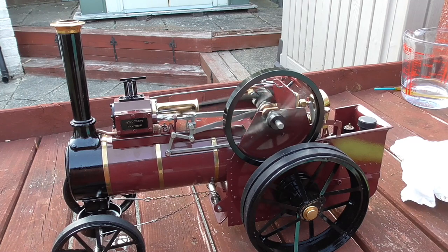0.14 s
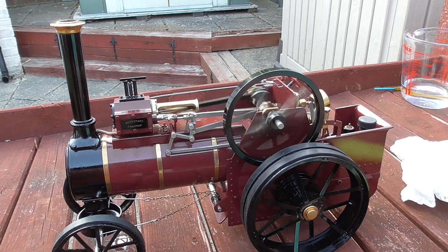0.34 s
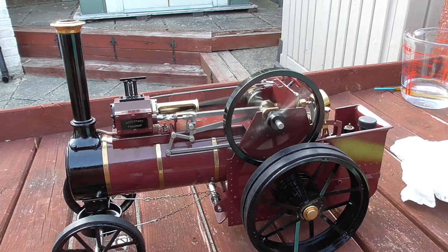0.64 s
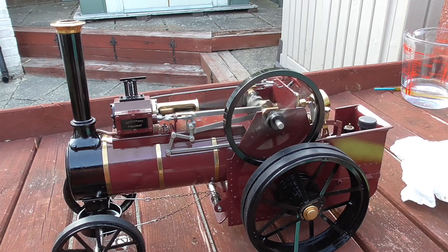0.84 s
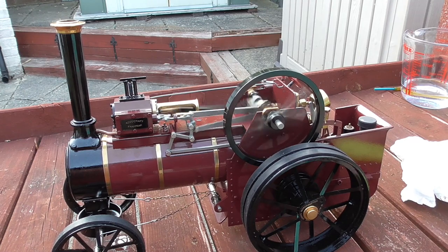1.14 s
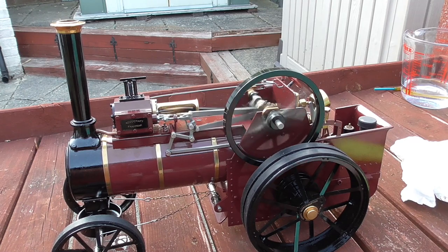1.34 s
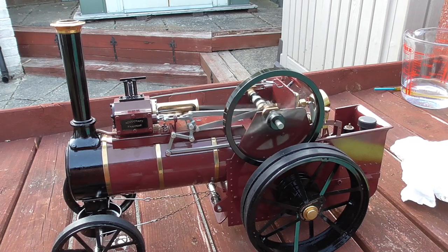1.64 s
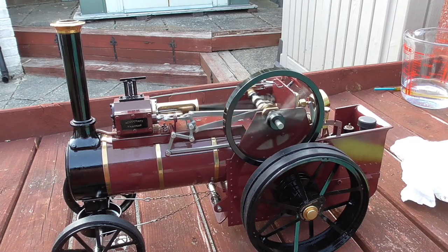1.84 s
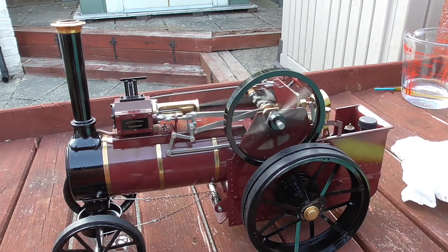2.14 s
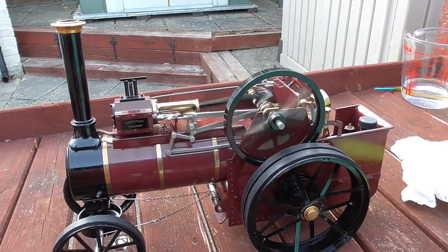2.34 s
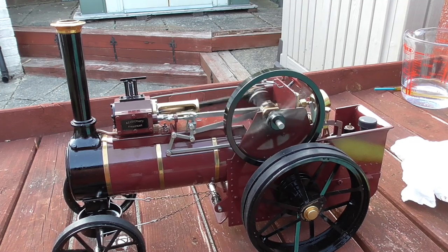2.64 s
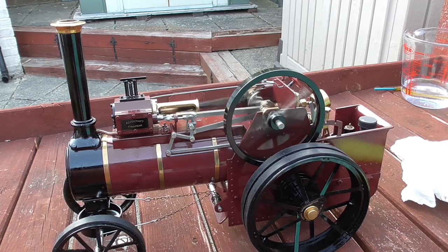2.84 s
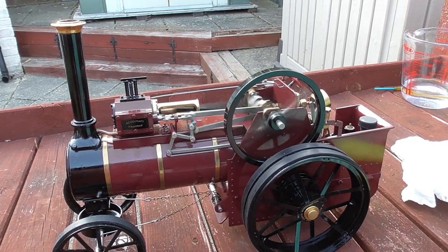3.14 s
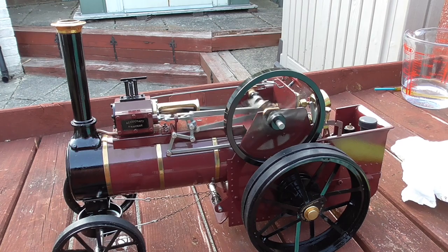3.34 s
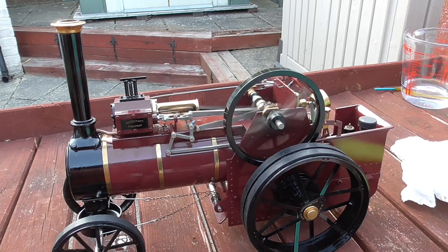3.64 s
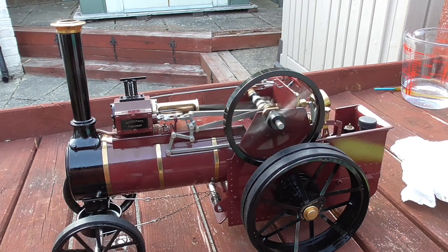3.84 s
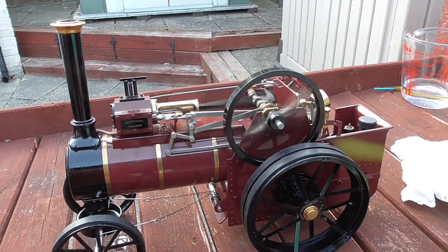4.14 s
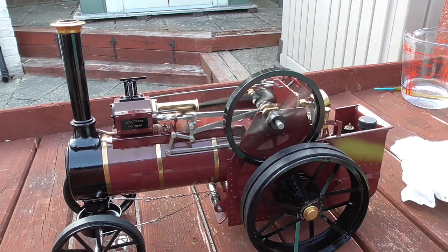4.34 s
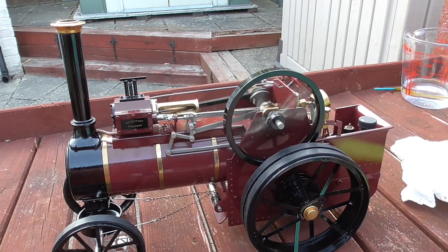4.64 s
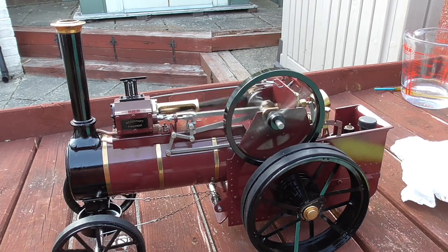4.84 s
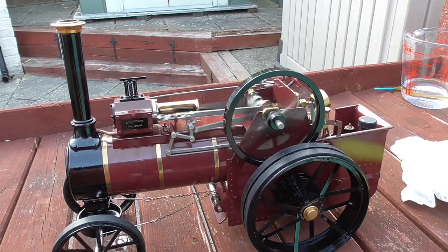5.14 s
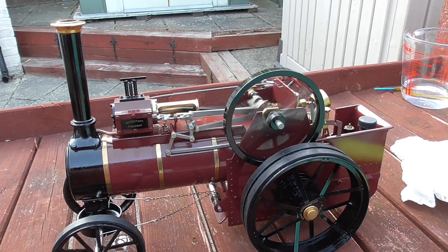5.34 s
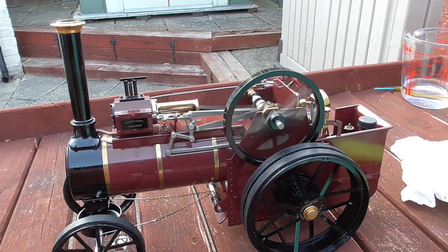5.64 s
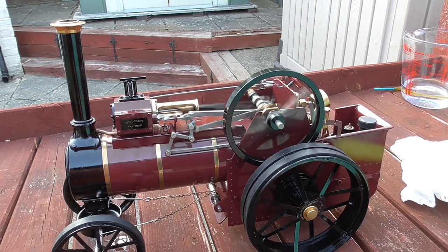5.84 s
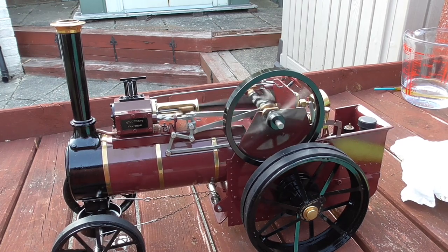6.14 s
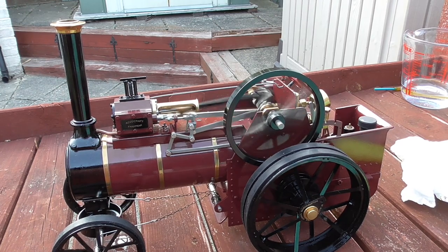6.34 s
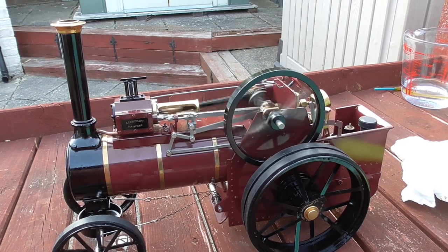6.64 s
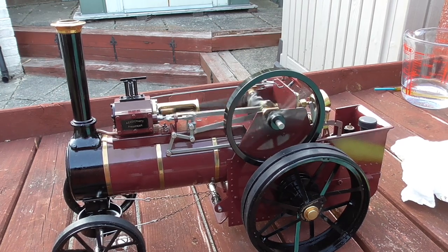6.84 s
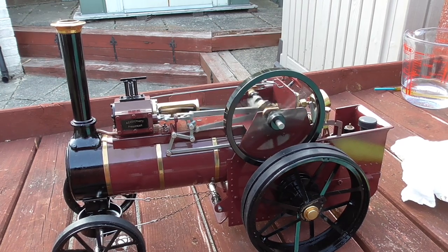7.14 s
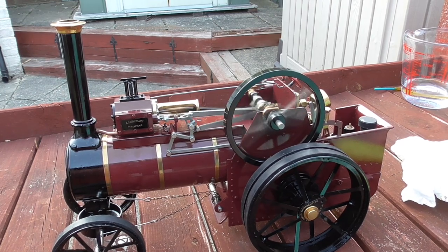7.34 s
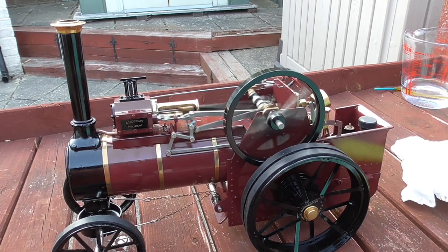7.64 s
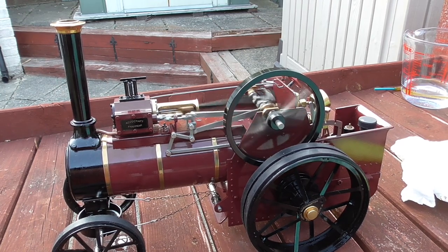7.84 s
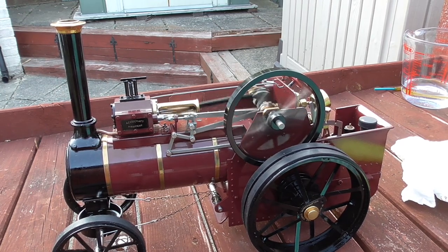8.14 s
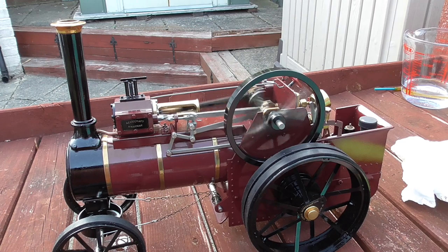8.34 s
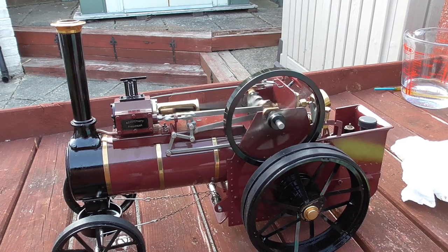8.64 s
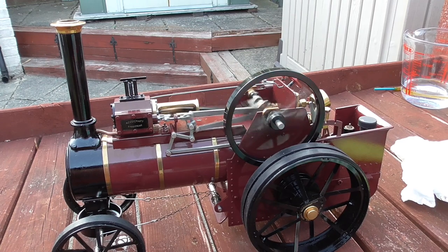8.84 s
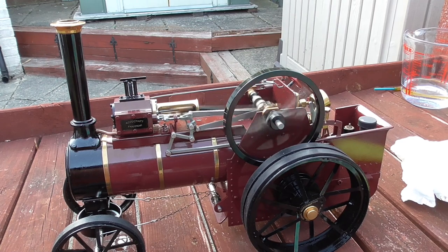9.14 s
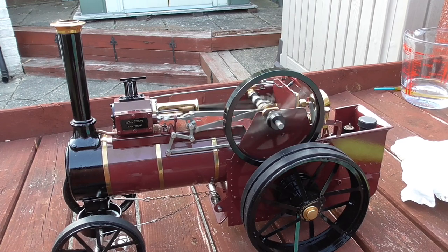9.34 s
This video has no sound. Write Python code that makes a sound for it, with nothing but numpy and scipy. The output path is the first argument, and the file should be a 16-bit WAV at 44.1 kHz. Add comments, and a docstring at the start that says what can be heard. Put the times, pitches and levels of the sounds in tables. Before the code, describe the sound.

A small model steam engine is already running at the start and keeps going unchanged to the end, about 9.5 seconds, on wooden decking in a yard, close to a stereo microphone. It turns a little over ten times a second, almost perfectly steady, with two exhaust beats per turn: a hard, bright puff with a whistling edge, then a longer hissy beat, sharper on some strokes. Steam hiss never quite stops. Light, dry metal taps from valve gear and rods tick in a fixed pattern each turn. Beneath, a gas burner gives a soft, hollow roar, swelling briefly near 1.1, 2.3, 3.3, 4.7 and 5.6 seconds, and mildly near 8.8. Tiny water spits crack at about 2, 4.7, 5.9 and 6.9 seconds, the strongest near 7.7. A faint distant rumble rises after 4 seconds, with a small bump near 4.5. Echoes are short and slight.

```python
"""A hard, fast chuff with a whistling edge, light metal taps, a burner's roar and a faint far rumble.
A small gas-fired model steam engine runs at over ten turns a second on wooden decking in a yard,
close to two microphone ports. Its double-acting cylinder exhausts twice a turn up the chimney as
shaped noise, the valve gear taps in decaying sines at set crank angles, drops of water spit in
the blast pipe, and the flame is noise through flue resonances, swelling now and then."""
import sys
import numpy as np
from scipy import signal
from scipy.fft import rfft, irfft, next_fast_len
from scipy.io import wavfile
from scipy.ndimage import uniform_filter1d

SR = 44100
rng = np.random.default_rng(int(sys.argv[2]) if len(sys.argv) > 2 else 0)


def pcm_store(signal):
    """Save signal as 16-bit PCM."""
    levels = np.round(np.clip(np.atleast_2d(signal), -1, 1) * 32767)
    wavfile.write(sys.argv[1], SR, levels.astype(np.int16).T)


N = 418509
TIME_S = np.arange(N) / SR
FILTER_HZ = np.fft.rfftfreq(4096, 1 / SR)


def gain_of(db):
    """Amplitude ratio of a level in dB."""
    return 10 ** (np.asarray(db) / 20)


def evened(x):
    """Scales a signal to an RMS of one."""
    return x / np.sqrt(np.mean(x ** 2) + 1e-20)


def read(points, hz):
    """Reads a curve between its points, along a logarithmic frequency axis."""
    point_hz, value = np.transpose(points)
    return np.interp(np.log(hz + 1), np.log(point_hz + 1), value)


def coloured(x, modes, steep, tilt_db=0):
    """Passes x through resonances whose powers add, with causal phase and unit gain for white noise."""
    power = 0
    for centre_hz, width_hz, level_db in modes:
        detuning = 2 * (FILTER_HZ - centre_hz) / width_hz
        power = power + gain_of(2 * level_db) / (1 + detuning ** 2) ** steep
    # folding the cepstrum forward in time gives minimum phase
    cepstrum = irfft(np.log(power * gain_of(2 * tilt_db) + 1e-12) / 2)
    cepstrum[1:2048] *= 2
    cepstrum[2049:] = 0
    taps = irfft(np.exp(rfft(cepstrum)))[:2048]
    return signal.oaconvolve(x, taps[None] / np.linalg.norm(taps), axes=1)[:, :N]


def turbulence(lumpy_db, size):
    """Two unrelated noises under one lumpy envelope, smoothed twice over size samples."""
    smooth = uniform_filter1d(uniform_filter1d(rng.standard_normal(N), size), size)
    return evened(rng.standard_normal((2, N)) * gain_of(lumpy_db * evened(smooth)))


def opening(age, start, rise):
    """A port opens smoothly from shut (0) to wide (1)."""
    return np.sin(np.pi / 2 * np.clip((age - start) / rise, 0, 1)) ** 2


# The flywheel gains speed very slowly: columns turn_number, start_s
CRANK_TURNS = [(0, -.0370), (10, .9205), (20, 1.8780), (30, 2.8320), (40, 3.7869), (50, 4.7395),
               (60, 5.6895), (70, 6.6402), (80, 7.5855), (85, 8.0545), (90, 8.5268), (100, 9.4730)]
TURN_COUNT = 101


def turn_starts():
    """Seconds at which each crank turn begins, evenly spaced between the tabled turns."""
    turn, start_s = np.transpose(CRANK_TURNS)
    return np.interp(np.arange(TURN_COUNT), turn, start_s)


# Level of the far rumble: columns time_s, level_db
RUMBLE_LEVEL = [(0, -59), (3.8, -60), (4.2, -54.5), (4.42, -56), (4.5, -47), (4.6, -57), (5.5, -56),
                (6.5, -57), (7.3, -55), (8.0, -57.5), (8.5, -55.5), (9.49, -57.5)]
# Its low resonances: columns centre_hz, width_hz, level_db
RUMBLE_MODES = [(71.6, 29, -1), (101.2, 35, 4.5)]


def rumble():
    """A faint rumble from beyond the yard comes and goes: noise through two low resonances."""
    time_s, level_db = np.transpose(RUMBLE_LEVEL)
    level = gain_of(np.interp(TIME_S, time_s, level_db))
    return coloured(level * rng.standard_normal((2, N)), RUMBLE_MODES, 3.2)


# Steady roar of the flame: columns time_s, level_db
FLAME_LEVEL = [(0, -34), (1.2, -34.5), (1.8, -34), (2.6, -32.5), (3.6, -34), (4.4, -34), (5.4, -34.5),
               (6.2, -35), (6.9, -34), (7.8, -35), (8.3, -34), (9.05, -36), (9.49, -34.5)]
# The flame flares up: columns peak_s, rise_db, half_length_s
FLAME_FLARES = [(1.109, 5, 0.069), (2.286, 4, .12), (2.64, 2, 0.15), (2.947, 0.5, .1), (3.32, 4.5, .12),
                (3.82, 1, .1), (4.28, 3, 0.095), (4.658, 5.5, 0.084), (4.967, 2, 0.083), (5.58, 3, .12),
                (5.819, 1.5, .1), (8.099, 1.5, .15), (8.831, 2.5, .09)]
# Resonances of the flue: columns centre_hz, width_hz, level_db
FLUE_MODES = [(189, 81, -3.5), (354, 232, -1), (714.3, 196, 5.5), (1377, 266, 2)]
# Overall colour of the roar: columns frequency_hz, level_db
FLAME_COLOUR = [(20, -34), (60, -17.5), (130, -2.5), (200, -1.5), (1500, -5.5), (1750, -17.5),
                (4000, -40.5)]


def burner():
    """The flame roars through the flue resonances; each exhaust beat draws on the fire a little."""
    time_s, level_db = np.transpose(FLAME_LEVEL)
    roar_db = np.interp(TIME_S, time_s, level_db)
    for peak_s, rise_db, half_s in FLAME_FLARES:
        roar_db += rise_db * np.clip(1 - abs(TIME_S - peak_s) / half_s, 0, 1)
    angle = 2 * np.pi * np.interp(TIME_S, turn_starts(), np.arange(TURN_COUNT))
    draught_db = 0.36 * np.cos(2 * angle - 1.3) + 0.42 * np.cos(angle - 2.2)
    flame = gain_of(roar_db + draught_db) * turbulence(1.54, size=250)
    roar = coloured(flame, FLUE_MODES, 1.795, read(FLAME_COLOUR, FILTER_HZ))
    deep = signal.lfilter(*signal.butter(2, [140, 300], "band", fs=SR), roar)
    # a swelling flame grows deeper
    return roar + 0.047 * (roar_db - np.median(level_db)) * deep


# Valve gear and rods, levels as at mid-scene:
# columns share_of_turn, pitch_hz, peak_db, drift_db_per_s, rise_s, t60_s
GEAR_TAPS = [(0.139, 1165, -37.5, -0.5, 0.004, 0.024), (.14, 1840, -48, 0, 0.0026, 0.026),
             (.15, 2227, -32.5, 0, 0.0022, 0.017), (.155, 2960, -37, 0.5, 0.0013, .009),
             (.475, 2152, -33.5, 0, 0.0048, .013), (.475, 2960, -37, -0.5, 0.0032, 0.0084),
             (0.509, 5080, -35, 0, 0.0034, 0.011), (.515, 4200, -49, -2, 0.0022, .01),
             (.515, 3200, -44, -2, .002, .008), (.515, 1890, -35, 0, 0.0041, 0.01),
             (.52, 1380, -41, -0.5, 0.0024, 0.013), (0.531, 2916, -33, 0, 0.0022, 0.014),
             (.52, 1186, -27.5, -0.17, 0.003, 0.022), (.585, 3370, -31, 0.25, 0.0032, 0.017),
             (.595, 2890, -33.5, 0, 0.0011, 0.019), (.6, 1884, -38.5, 0, 0.0019, 0.01),
             (.61, 5150, -41, 0.5, 0.0043, 0.017), (.63, 2325, -33.5, 0.5, 0.003, 0.013),
             (.65, 4050, -42, 0.5, .004, .012), (0.671, 1190, -37.5, -0.5, 0.0034, 0.024),
             (.78, 2880, -40.5, 0, 0.0021, 0.029), (.83, 3925, -35.5, 0.7, 0.0029, 0.018)]


def valve_gear():
    """Loose joints tap at set crank angles, each blow a decaying sine a little unlike the last."""
    opens, out = turn_starts(), np.zeros(N + SR)
    t = np.arange(2000) / SR
    for share, pitch_hz, peak_db, drift_db, rise_s, t60_s in GEAR_TAPS:
        chance = rng.standard_normal((TURN_COUNT - 1, 3))
        blow_s = opens[:-1] + share * np.diff(opens) + .0004 * chance[:, 0]
        shape = opening(t, 0, rise_s) * gain_of(-60 * np.maximum(t - rise_s, 0) / t60_s)
        for start_s, (_, force, bend) in zip(blow_s, chance):
            if start_s > 0:
                level_db = peak_db + drift_db * (start_s - N / SR / 2) + 0.62 * force
                ring = np.sin(2 * np.pi * pitch_hz * (1 + 0.011 * bend) * t)
                out[round(start_s * SR):][:len(t)] += gain_of(level_db) * shape * ring
    taps = out[:N]
    # a weak copy 40 samples later sets the two ports apart
    return np.array([taps, 0.17 * np.roll(taps, 40)])


# Blast pipe and chimney resonances:
# columns centre_hz, width_hz, front_puff_db, front_hiss_db, back_stroke_db
CHIMNEY_MODES = [(2310, 313, -9.5, 0.5, 2.5), (3040, 245, -14, -9, -9), (3450, 460, -9.5, -9, -5.5),
                 (4500, 365, 2.5, 2.5, 5), (5040, 650, -3.5, -7.5, -7), (6346, 590, -8, -5, -3.5),
                 (7124, 295, 5, 1, 5.5), (7470, 340, 0.5, -11, 1), (8725, 400, 4.5, 3.5, 9.5),
                 (9570, 330, 3, -4.5, 5.5), (9960, 310, 1.5, 4.5, 3), (10300, 500, 1.5, -3, 1.5),
                 (11410, 310, 0, -3, 1), (11940, 650, -0.5, -10, -2.5), (13200, 350, -11, -9.5, -6),
                 (13700, 400, -16, -12, -12), (14300, 300, -19, -16, -15), (15100, 600, -21, -15.5, -13)]
# Drops of water that spit in the blast pipe: columns start_s, level_db
WATER_SPITS = [(1.985, -25), (2.3027, -27), (4.674, -28), (5.891, -25), (6.880, -26), (7.517, -31),
               (7.7147, -17), (7.794, -26)]


def spits():
    """A drop flashes to steam: a very short bright crack through the chimney modes."""
    flow = np.zeros(N)
    for start_s, level_db in WATER_SPITS:
        fall_db = 5100 * np.clip(TIME_S - start_s, 0, 1)
        flow += gain_of(level_db - fall_db) * opening(TIME_S, start_s, .001)
    centre_hz, width_hz, *colours = np.transpose(CHIMNEY_MODES)
    return coloured(flow * rng.standard_normal((2, N)), zip(centre_hz, width_hz, colours[-1]), 1.4)


def crank():
    """Turn number and seconds since the front chuff began, for every sample."""
    jitter_s = .0007 * rng.standard_normal(TURN_COUNT)
    # each chuff begins its soft rise 2 ms before the marked turn start, give or take the jitter
    begins = turn_starts() + jitter_s - .002
    turn = np.clip(np.searchsorted(begins, TIME_S, "right") - 1, 0, None)
    return turn, TIME_S - begins[turn]


# Front strokes that sing out clearly: columns start_s, whistle_db, pitch_hz
SINGING_STROKES = [(.058, -25, 4530), (.73, -20, 4470), (.824, -22, 4550), (.92, -19, 4590),
                   (1.015, -19, 4470), (1.208, -18, 4460), (1.591, -21, 4420), (1.783, -20.5, 4540),
                   (2.07, -24, 4660), (2.164, -23, 4650), (2.26, -24, 4505), (2.451, -19, 4585),
                   (2.64, -24, 4370), (2.832, -24, 4490), (3.119, -22.5, 4580), (3.214, -22.5, 4530),
                   (3.309, -21, 4520), (3.501, -20, 4720), (3.787, -23, 4460), (3.882, -21, 4480),
                   (3.978, -19, 4470), (4.359, -21.5, 4540), (4.454, -22, 4470), (4.644, -23, 4420),
                   (4.74, -24, 4480), (5.119, -23, 4540), (5.498, -20, 4460), (5.594, -23, 4610),
                   (5.69, -21.5, 4410), (5.784, -23, 4440), (6.259, -24, 4570), (6.451, -23.5, 4370),
                   (6.546, -21, 4440), (7.207, -22, 4580), (7.774, -18, 4640), (7.868, -21, 4480),
                   (8.148, -24, 4500), (9.0, -21, 4480), (9.283, -22, 4330)]
# Back strokes that open with a sharp puff: columns start_s, puff_db
SHARP_BACK_STROKES = [(.004, -26), (.483, -24), (.58, -24), (1.057, -26), (1.919, -28), (2.301, -27),
                      (3.542, -24), (3.732, -24), (4.115, -23), (4.59, -26), (5.731, -25), (5.922, -26),
                      (6.017, -26), (6.492, -22), (7.627, -25), (7.815, -23), (8.284, -28), (8.946, -27),
                      (9.232, -24), (9.419, -23)]


def strokes():
    """Per turn: scattered drive levels in dB and whistle pitch in Hz, some set by the tables."""
    mean, spread = np.transpose([
        (-20.5, 0.78),  # front puff
        (-26.5, 2.3),  # whistle
        (-30.5, 1.2),  # front hiss
        (-29, 1.3),  # back puff
        (-29.5, 0.61),  # back hiss
        (4525, 100),  # whistle pitch
    ])
    rows = mean + spread * np.clip(rng.standard_normal((TURN_COUNT, 6)), -2, 2)
    opens = turn_starts()
    for start_s, whistle_db, pitch_hz in SINGING_STROKES:
        rows[abs(opens - start_s).argmin(), [1, 5]] = whistle_db, pitch_hz
    for start_s, puff_db in SHARP_BACK_STROKES:
        rows[np.searchsorted(opens, start_s) - 1, 3] = puff_db
    return rows


def whistle(level, pitch_hz, age):
    """The first rush sings in one pipe mode: narrow noise, steadier than plain noise, around a pitch."""
    jet = level * opening(age, 0, 0.0087) * gain_of(2.5 - 1140 * age)
    swing = np.exp(2j * np.pi * np.cumsum(pitch_hz) / SR)
    noise = rng.standard_normal((2, N)) + 1j * rng.standard_normal((2, N))
    waver = signal.lfilter(*signal.butter(2, 150, fs=SR), noise)
    waver /= abs(waver) ** 0.6  # evens out the swells
    return jet * evened((waver * swing).real)


# The narrow nozzle passes little bass: columns frequency_hz, level_db
NOZZLE_COLOUR = [(1500, -9.5), (1900, -1), (2150, 0.5), (16000, -1)]


def exhaust():
    """Each port opens on a puff of high pressure; the piston then pushes the rest out as hiss."""
    turn, age = crank()
    *stroke_db, pitch_hz = strokes()[turn].T
    puff, whistle_level, hiss, back_puff, back_hiss = gain_of(stroke_db)
    back_s = (0.0409 + 0.00057 * rng.standard_normal(TURN_COUNT))[turn]
    back_age = age - back_s

    front_burst = puff * opening(age, 0, 0.0061) * gain_of(3 - 1036 * age)
    front = hiss * opening(age, 0, 0.0063) * gain_of(-2.5 - 122 * age)
    front *= 1 - 0.74 * opening(age, 0.033, 0.0057)
    front *= 1 - opening(age, back_s, 0.0065)
    leak = gain_of(-39.5)  # steam past the valve never stops

    back = np.hypot(back_puff * gain_of(-900 * np.maximum(back_age, 0)), back_hiss * gain_of(-25 * back_age))
    back *= opening(age, back_s - .001, 0.0051) * (1 - opening(age, 0.0779, 0.011))
    # the flow sags, then picks up as the valve knocks over
    back *= 1 - 0.19 * opening(age, 0.052, .005) + 0.29 * opening(age, 0.059, .002)

    centre_hz, width_hz, *colours = np.transpose(CHIMNEY_MODES)
    tilt_db = read(NOZZLE_COLOUR, FILTER_HZ)
    steam = np.zeros((2, N))
    for flow, mode_db in zip((front_burst, front + leak, back), colours):
        modes = zip(centre_hz, width_hz, mode_db)
        steam += coloured(flow * turbulence(0.92, size=40), modes, 1.336, tilt_db)

    # the high modes speak more on some strokes
    top = signal.lfilter(*signal.butter(1, [8200, 10600], "band", fs=SR), steam)
    wetness = rng.standard_normal((TURN_COUNT, 2))[turn, 1 * (age > back_s)]
    steam += 0.18 * uniform_filter1d(wetness, size=200) * top
    return steam + whistle(whistle_level, pitch_hz, age)


def yard(x):
    """Boards and fence send back a short scatter of echoes: decaying noise after a 2 ms gap."""
    t = np.arange(4000) / SR
    tail = rng.standard_normal((2, len(t))) * gain_of(-60 * t / 0.088) * (t > .002)
    return x + gain_of(-14) * signal.oaconvolve(x, tail / np.linalg.norm(tail[0]), axes=1)[:, :N]


def scene():
    """Steam rings in the yard; taps, flame and rumble are added without its echoes."""
    return rumble() + burner() + valve_gear() + yard(spits() + exhaust())


# Likeness of the two ports: columns frequency_hz, correlation
PORT_LIKENESS = [(60, 0.94), (130, 1), (900, 0.93), (3000, 0.98), (6000, 0.85), (6700, 0.75), (7100, 1),
                 (8100, 0.73), (8600, 1), (9100, 0.55), (9600, 0.93), (11100, 0.79), (11900, 0.92),
                 (14500, 0.46), (15300, .75)]
# Level balance of the ports: columns frequency_hz, left_minus_right_db
PORT_BALANCE = [(60, -1.5), (400, -1.3), (800, 0.5), (1150, -5.5), (1400, 2), (1900, -2.5), (2500, 3.5),
                (2800, -0.5), (4300, 1.5), (5500, -.7), (6800, 1), (7300, -2.5), (8100, 5), (8700, -2.5),
                (9800, 1.5), (10700, 10), (11300, -2), (12000, 2.5), (13400, -4), (14200, -2), (15800, 1.5)]
# Phase between the ports: columns frequency_hz, left_lead_rad
PORT_LEAD = [(0, 0.3), (1460, -0.094), (2500, 0.73), (2760, -0.31), (3880, 0.0), (4740, 0.55),
             (5600, -0.13), (6460, 0.86), (6720, 0.1), (8010, 0.017), (8870, 0.46), (12800, 0.04),
             (14400, -0.3), (16000, 0.1)]


def record(dry):
    """Two close microphone ports share most of the sound; then a low-pass limits the band."""
    size = next_fast_len(N + 8192)
    hz = np.fft.rfftfreq(size, 1 / SR)
    shared, apart = rfft(dry, size)
    angle = np.arccos(np.clip(read(PORT_LIKENESS, hz), 0, 1)) / 2
    # half of each difference goes to either side
    port = gain_of(read(PORT_BALANCE, hz) / 2) * np.exp(.5j * read(PORT_LEAD, hz))
    left = (np.cos(angle) * shared + np.sin(angle) * apart) * port
    right = (np.cos(angle) * shared - np.sin(angle) * apart) / port
    pair = irfft(np.array([left, right]), size)[:, :N]
    low_pass = signal.firwin(511, 15780, window=("kaiser", 9), fs=SR)
    return signal.oaconvolve(pair, low_pass[None], "same")


dry = scene()
out = record(dry)
pcm_store(out)
```